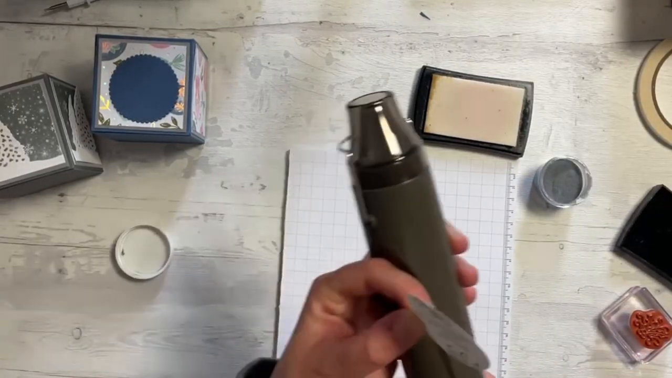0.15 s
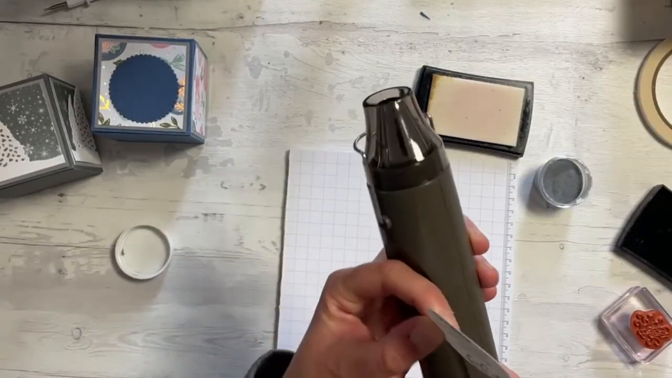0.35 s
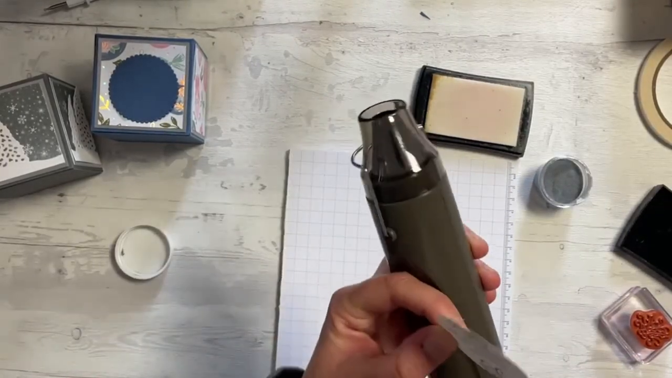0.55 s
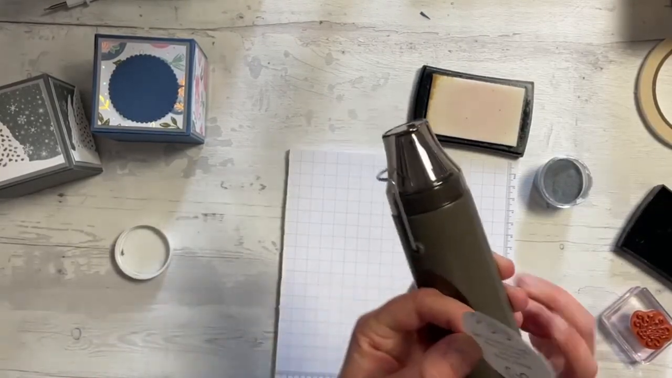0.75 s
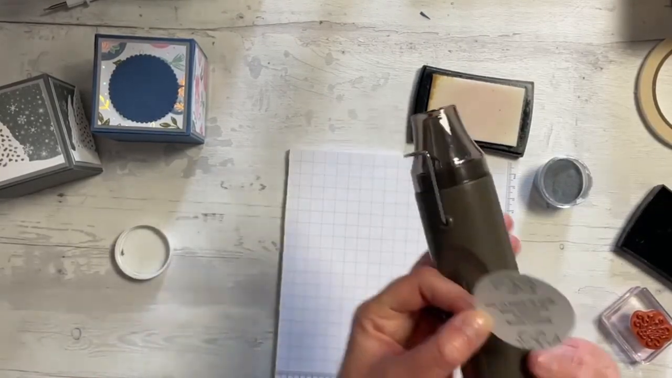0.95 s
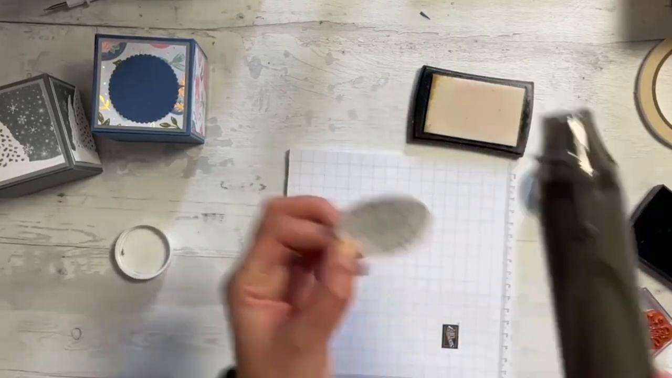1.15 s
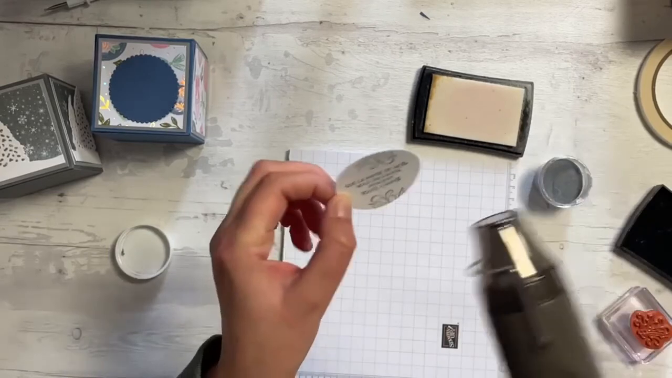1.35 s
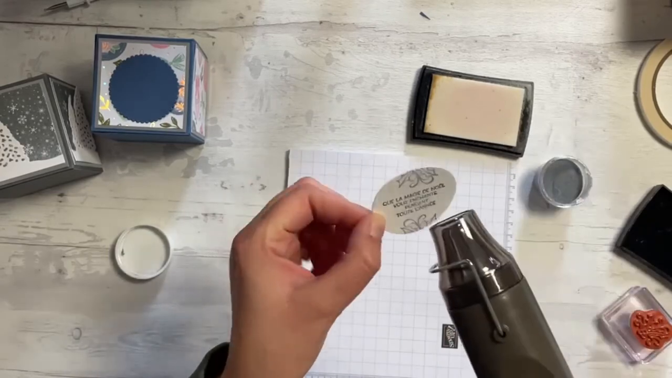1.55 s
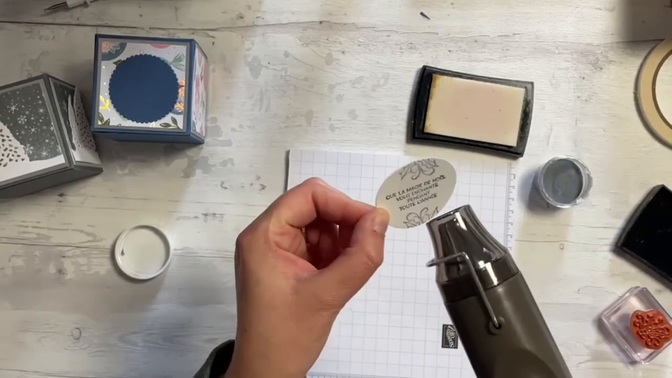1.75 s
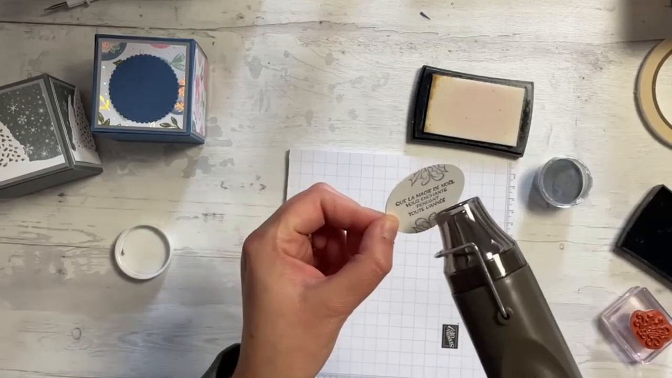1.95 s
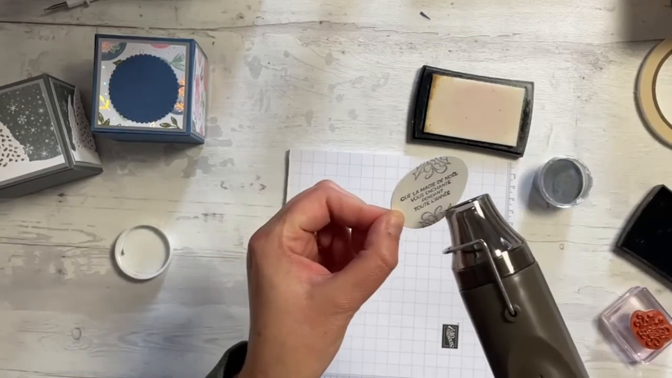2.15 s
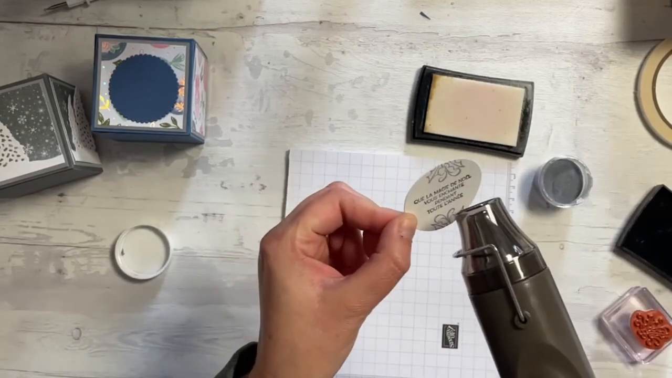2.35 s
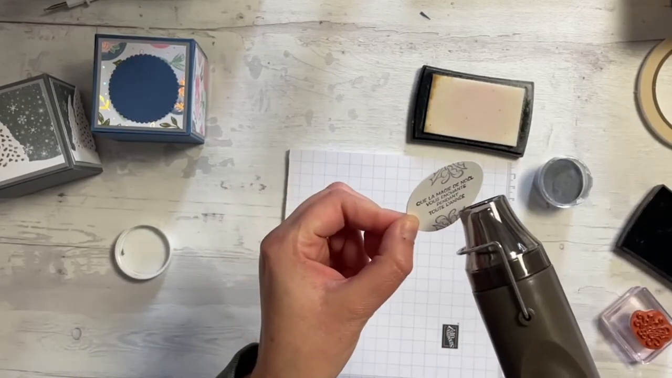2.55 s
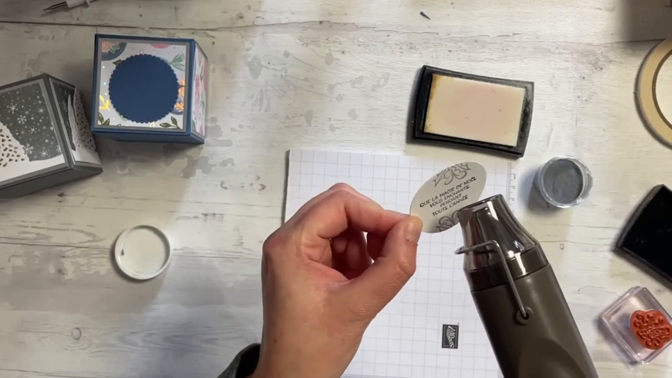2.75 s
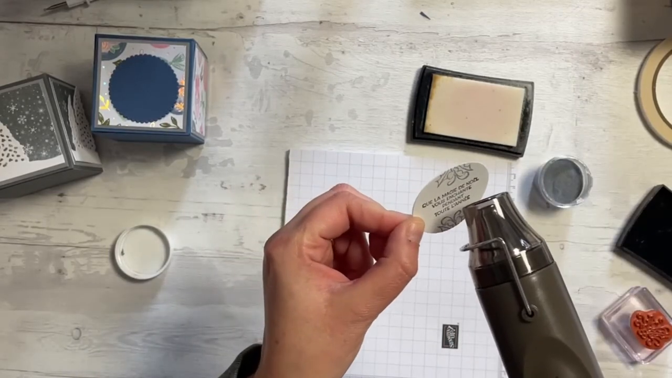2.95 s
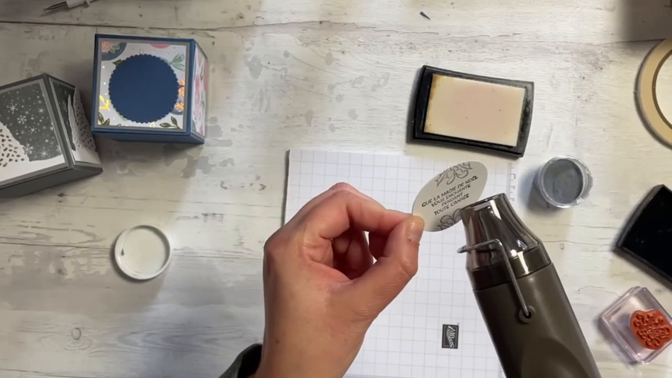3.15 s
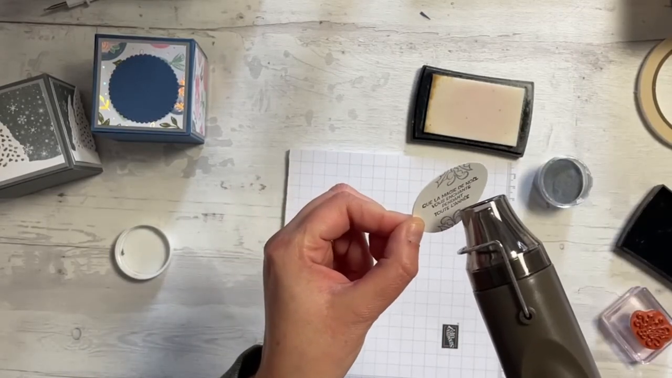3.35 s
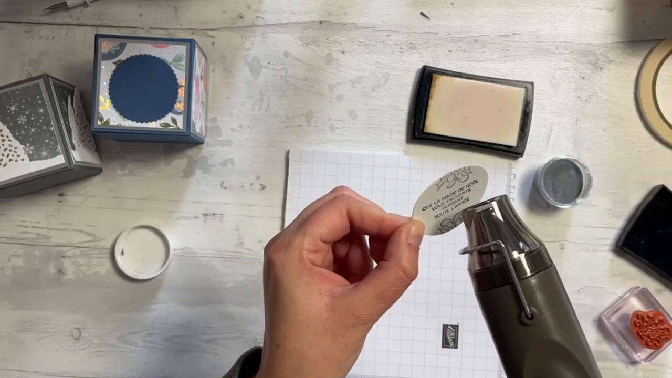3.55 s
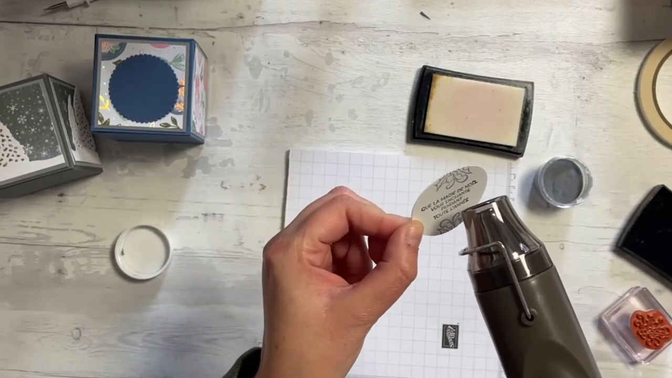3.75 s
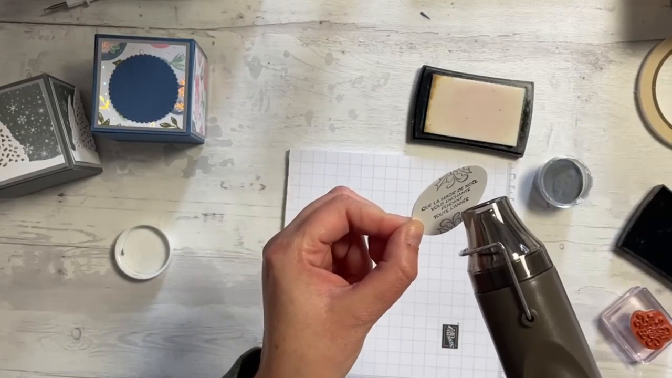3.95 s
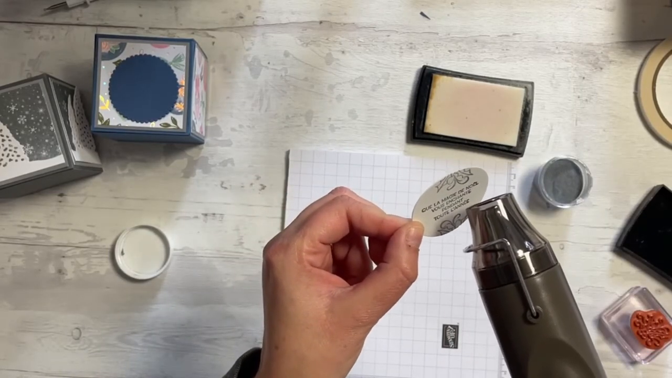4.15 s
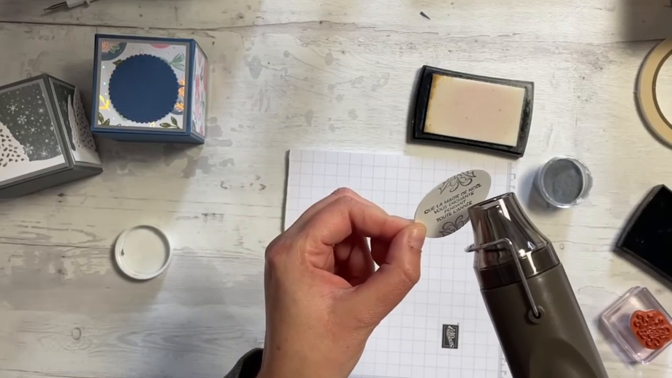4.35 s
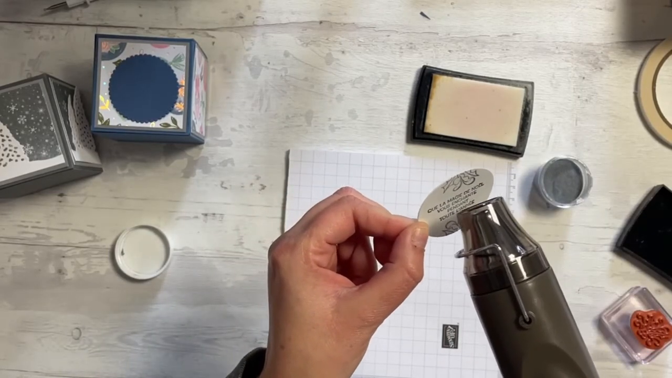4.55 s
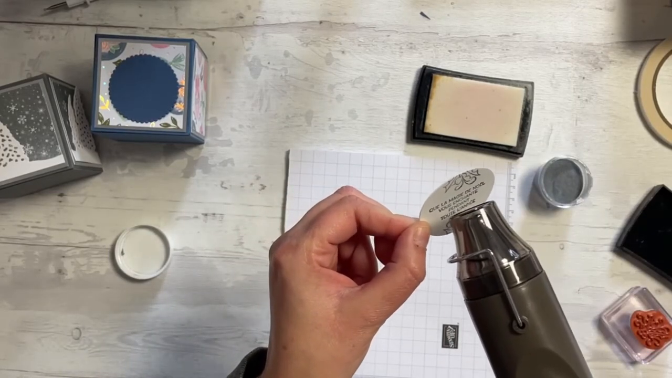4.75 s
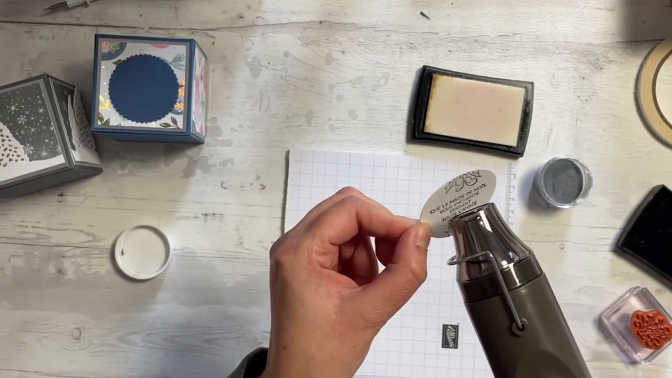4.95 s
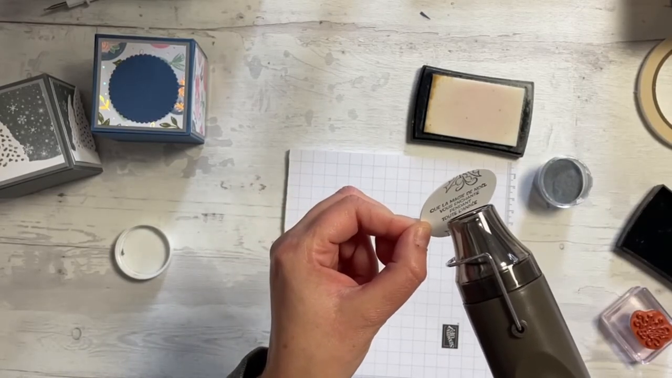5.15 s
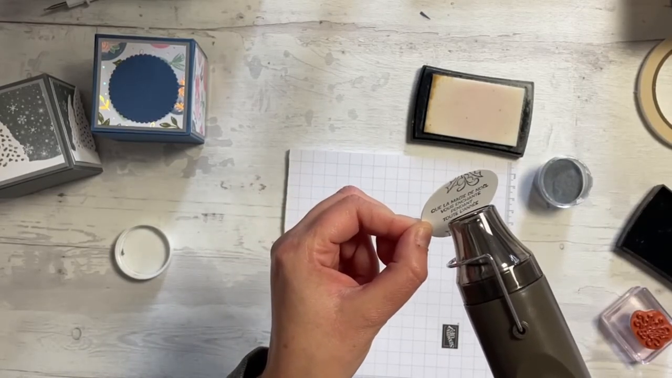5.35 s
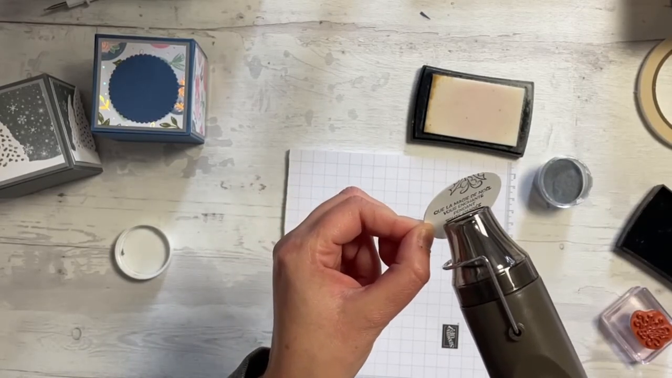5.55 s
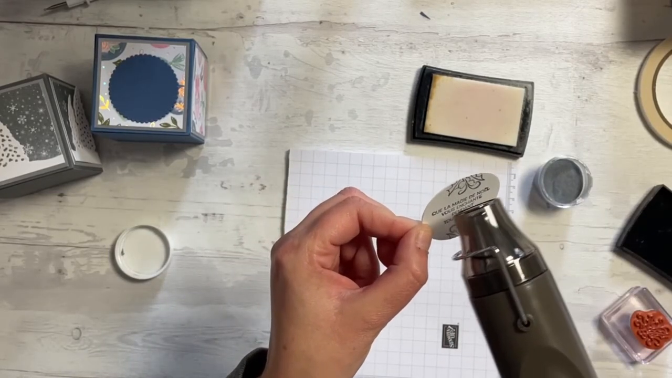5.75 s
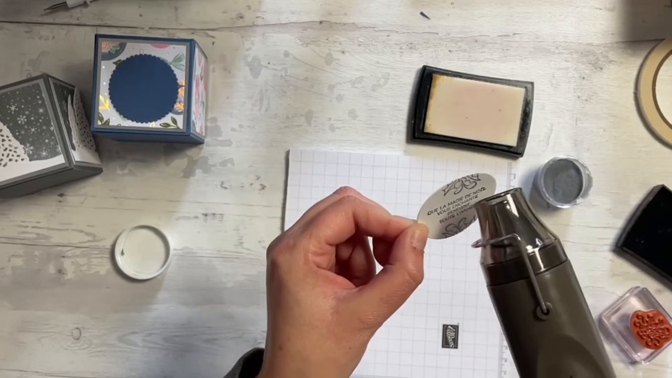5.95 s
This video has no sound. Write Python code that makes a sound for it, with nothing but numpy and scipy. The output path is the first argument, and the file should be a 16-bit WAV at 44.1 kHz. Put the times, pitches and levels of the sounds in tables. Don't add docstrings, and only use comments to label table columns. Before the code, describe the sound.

In a quiet small room, faint finger rubbing precedes a sharp plastic switch snap. A little electric motor spins up quickly into a bright whine with rushing, hissing hot air, loudest close to the microphone and easing as it moves away. Around three seconds the phone's noise suppression abruptly cuts the level, leaving the same steady blow quieter, with small low thumps of air.

```python
import sys
import numpy as np
from scipy import signal
from scipy.fft import rfft, irfft
from scipy.io import wavfile
from scipy.ndimage import uniform_filter1d, map_coordinates

SR = 44100
rng = np.random.default_rng(int(sys.argv[2]) if len(sys.argv) > 2 else 0)


def rack_gain(trim_db):
    fader = np.asarray(trim_db, float)
    return 10 ** (fader / 20)


def store_pcm(level_fs):
    pcm = np.round(np.clip(level_fs, -1, 1) * 32767).astype(np.int16)
    wavfile.write(sys.argv[1], SR, np.atleast_2d(pcm).T)


N = 269010

# pitch_hz, level_db (per Hz)
ROOM_TONE = [(35, -60), (60, -18), (208, 1), (359, 3), (461, 0), (811, -5), (1880, -13), (6370, -3),
             (13400, -19)]
# start_s, level_db
RUSTLE = [
    (0, -60.5),
    (.02, -70),
    (.06, -66),
    (.14, -82),
    (.2, -85),
    (.24, -78),
    (.28, -88),
    (6.1, -90),
]
# start_s, peak_db, pitch_hz, length_s
PUFFS = [(0.703, -33.5, 120, 0.047), (0.753, -47, 90, 0.1), (1.868, -59, 80, 0.09), (2.023, -68, 70, 0.066),
         (2.52, -66, 90.1, 0.064), (2.782, -64, 80, 0.17), (4.716, -58, 80, .12), (5, -28.5, 117, 0.027),
         (5.04, -54, 50, 0.042), (5.074, -41, 89, 0.074), (5.137, -48, 80, 0.081), (5.245, -46, 60, 0.073),
         (5.3, -58.5, 55, .2), (5.47, -47, 80.4, .05), (5.53, -47, 60, .07), (5.7, -60, 55, .2),
         (5.513, -29, 119.4, 0.038), (5.598, -24.5, 122, 0.026), (5.624, -31, 120, 0.036),
         (5.668, -42, 129.3, 0.028), (5.77, -62, 60, .06), (5.904, -47, 89.9, 0.03)]
# start_s, peak_db, echo_db, low_edge_hz, dull_above_hz
SWITCH = [
    (0.3, -71, -2, 1000, 3000),
    (0.3085, -38, -5, 1120, 3600),
    (.393, -50, -30, 500, 6000),
    (0.397, -18.5, -10.5, 447, 11000),
    (0.4061, -26.5, -5, 910, 6100),
]
# pitch_hz, width_hz, level_db
SWITCH_BODY = [(1330, 200, -12.5), (2080, 650, 2.5), (3000, 290, -6), (3600, 810, -6.5), (4800, 1000, 1.5),
               (6000, 1500, -8), (7500, 630, -4), (8500, 600, 3), (11200, 700, -29)]
# pitch_hz, level_db (per Hz)
BARREL = [(50, -125), (110, -91), (170, -83), (250, -73), (330, -78), (485, -82.5), (515, -69),
          (680, -64.5), (900, -73.5), (1500, -70.5), (1900, -66.5), (2230, -80), (2600, -67.5), (3050, -79)]
# pitch_hz, level_db (per Hz)
NOZZLE = [(3050, -78), (3600, -81), (3950, -90), (4750, -77), (5700, -84), (6100, -84), (6450, -86),
          (7200, -81), (7900, -79), (8350, -90), (8900, -80.5), (9500, -91), (10000, -85.5), (11800, -98),
          (13300, -100)]
# pitch_hz, width_hz, lift_db
STANDING = [(539.6, 8.3, 6.5), (586.5, 19, 1.5), (640, 16.3, 6.5), (671.4, 3.5, 7.5), (774.3, 24.6, 6.5),
            (835, 16, 8), (937, 6.2, 15), (1006, 41, -3), (1094, 8.4, 8), (1147, 9.2, 3), (1448, 34, -7),
            (1475, 7.1, 2), (1562, 64, -7.5), (1725, 51, 3), (1700, 8.6, -34), (1925, 20, 5.5),
            (1940, 33, -7), (1864, 28, 6), (1963, 62, 7.5), (2100, 31, -3.5), (2230, 30, 1), (2500, 15, -6),
            (2598, 11.5, 7.5), (2820, 46, 4), (6500, 170, -3), (7900, 280, -2.5), (9400, 220, -3),
            (13000, 170, 8)]
# speed_power (exponent), level_db, nearness_share (0 to 1)
FLOW_LAW = [
    (5, -.5, .1),
    (3.37, 0.48, 0.82),
    (4.3, 0.8, 0.65),
    (3.4, -1, 0.86),
]
# time_s, level_db
NEARNESS = [
    (.6, 6.5),
    (.75, 5),
    (.95, 3.5),
    (1.3, 2.1),
    (2.1, 0.9),
    (3.1, .1),
    (4.1, -1),
    (6.1, -1),
]
# above_hz, start_s
SETS_IN = [(1530, 0.524), (2300, 0.533), (2950, 0.59), (3800, 0.63), (5000, 0.565), (6800, 0.555),
           (8200, 0.62), (9600, 0.63)]
# time_s, speed (turns per s)
RUNNING = [
    (.9, 249),
    (1.25, 248.2),
    (1.75, 248.4),
    (2.2, 248.8),
    (2.95, 249.6),
    (3.45, 249.1),
    (3.8, 248),
    (4.55, 248),
    (5.1, 249.3),
    (6.1, 251.2),
]
# shaft_multiple, level_db
MAIN_TONES = [(5, -80), (6, -53), (15, -64.5), (25, -56), (35, -62), (20, -80), (30, -59), (36, -68),
              (40, -56.5), (45, -68.5)]
# shaft_multiple, lifted_db, at_paper_db
SIDE_TONES = [(1, -51.5, -51), (2, -54, -57), (3, -53, -56), (4, -59, -52), (7, -48, -48), (8, -59, -56),
              (10, -47, -45), (11, -62, -63), (19, -55, -54), (21, -65, -60), (22, -60, -60),
              (27, -58, -66), (28, -55, -58), (29, -47, -50), (31, -59, -66), (32, -57, -60),
              (41, -65, -60), (42, -65, -61), (44, -62, -61), (48, -70, -70), (50, -74, -69)]
# shaft_multiple, centre_s, peak_db, half_length_s
BLADE_SWELLS = [(5, .515, -44, .03), (5, .565, -45, .03), (5, .62, -42, .03), (5, .69, -44, .035),
                (5, .744, -41.5, .04), (5, .827, -41, .032), (5, .974, -42, .078), (5, 1.273, -50, .064),
                (5, 2.019, -36.5, .629), (5, 3.655, -41.5, .473), (5, 4.724, -42, .444),
                (5, 5.967, -41, .291), (6, .78, -48, .05), (6, .97, -45, .09), (15, .947, -56, .068),
                (15, 3.04, -54.3, .3), (15, 3.9, -63, .4), (15, 5.684, -59, .8), (25, 1.083, -53, .1),
                (25, 1.9, -50.5, .83), (25, 2.983, -49.2, .253), (25, 4.1, -51, .714),
                (25, 5.593, -46.2, .689), (35, 1.3, -55, .12), (35, 2.7, -63, .4), (35, 4.945, -52.5, .634),
                (35, 6.1, -46.5, .4), (45, 2.4, -57, 1.2), (35, .75, -56, .06), (25, .68, -58, .06)]
# shaft_multiple, centre_s, peak_db, half_length_s
BRUSH_SWELLS = [(20.0, 0.778, -42, 0.024), (20.0, 0.973, -42.5, 0.094), (20.0, 1.58, -49, 0.34),
                (20.0, 2.88, -41, 1.35), (20.0, 4.52, -52, 0.266), (20.0, 5.267, -43.0, 0.43),
                (20.0, 6.017, -47, 0.18), (30.0, 0.976, -35.5, 0.088), (30.0, 1.3, -42, 0.087),
                (30.0, 1.66, -40.5, 0.284), (30.0, 2.32, -42.5, 0.31), (30.0, 3.41, -46.5, 0.33),
                (30.0, 4.87, -48, 0.15), (30.0, 5.4, -47.5, 0.37), (36.0, 1.067, -48, 0.032),
                (36.0, 1.403, -55, 0.34), (36.0, 1.62, -50, 0.99), (36.0, 3.7, -56, 0.56),
                (40.0, 1.067, -46, 0.051), (40.0, 1.205, -49, 0.064), (40.0, 2.02, -46.4, 0.48),
                (40.0, 3.7, -54.5, 0.81)]
# time_s, rush_db, loudest_whine_db, lesser_whines_db
SUPPRESS = [
    (0, -1.5, -2, -0.5),
    (3.098, 0.5, 1, -1),
    (3.11, -10.5, 1, 0),
    (3.14, -10.7, 2.5, -8),
    (3.16, -11.5, -1, -11),
    (3.2, -10.5, -1.5, -17),
    (3.23, -10.5, -12, -11.5),
    (6.1, -10, -11, -11),
]
# low_hz, high_hz
LOUDEST_BAND_HZ = (4880, 5100)
LESSER_HZ = (3742, 6238)
# above_hz, threshold (of slow chance, spread about 1)
TOP_DROPS = [(12300, -1.3), (12800, .2), (13150, 1.2)]

ROOM_TONE_DB = -76.5
SWITCH_T60_S, BURST_S = 0.21, 0.0022
SET_IN_S, BEFORE_DB = 0.01, -9.5
MOTOR_ON_S, SPIN_UP_S = .385, .162
SMEAR = .03
MAINS_RIPPLE_HZ, RIPPLE_TURNS = 100, .001
FAINT_DB, FAINT_SCATTER_DB, FAINT_FALL_DB = -64, 1.5, 4.5
PATCHY = .15
MIC_EDGE_HZ = 13900


def in_time(rows):
    s, *columns = np.transpose(rows)
    return [np.interp(np.arange(N) / SR, s, c) for c in columns]


def bins_hz():
    return np.arange(N // 2 + 1) * SR / N + 1e-3


def at_hz(points):
    points = np.array(points)
    return np.interp(np.log(bins_hz()), np.log(points[:, 0]), points[:, 1])


def above(x, hz, width_hz):
    return irfft(rfft(x) * np.clip((bins_hz() - hz) / width_hz + .5, 0, 1), N)


def band(x, low_hz, high_hz, width_hz):
    return above(x, low_hz, width_hz) - above(x, high_hz, width_hz)


def noise(colour_db):
    return irfft(rfft(rng.standard_normal(N)) * rack_gain(colour_db), N) * np.sqrt(SR / 2)


def rms_one(x):
    return x / np.sqrt(np.mean(x ** 2))


def drift(rate):
    knots = rng.standard_normal(400)
    return map_coordinates(knots, [np.arange(N) / SR * rate], order=3, mode="wrap")


def resonate(x, hz, width_hz):
    r = np.exp(-np.pi * width_hz / SR)
    poles = [1, -2 * r * np.cos(2 * np.pi * hz / SR), r * r]
    return signal.lfilter(np.array([1, 0, -1]) * (1 - r * r) / 2, poles, x)


def room():
    t = np.arange(N) / SR
    tone_bed = rack_gain(ROOM_TONE_DB) * rms_one(noise(at_hz(ROOM_TONE)))
    rustle = rms_one(noise(at_hz([(500, -14), (1800, -4), (5000, -9), (9000, -4), (13000, -22)])))
    ring = rack_gain(-46 - 60 * t / 0.039) * np.sin(2 * np.pi * 4943 * t)
    return tone_bed + rack_gain(in_time(RUSTLE)[0]) * rustle + ring


def puffs():
    out = np.zeros(N)
    t = np.arange(SR // 4) / SR
    for s, peak_db, hz, length in PUFFS:
        progress = np.minimum(t / length, 1)
        swing = np.sin(2 * np.pi * hz * t * (1 - 0.037 * progress) + 6 * rng.random())
        lumpy = rms_one(resonate(resonate(rng.standard_normal(len(t)), hz, hz), hz, hz))
        rough = np.clip(length / 0.054, 0, 1)
        lump = np.sin(np.pi * progress) ** 2 * ((1 - rough) * swing + 0.35 * rough * lumpy)
        start = round(s * SR)
        out[start:][:len(t)] += (rack_gain(peak_db) * lump)[:N - start]
    return out


def switch():
    out = np.zeros(N)
    t = np.arange(SR // 2) / SR
    for s, peak_db, echo_db, low_hz, dull_hz in SWITCH:
        rattle = rng.standard_normal(len(t))
        body = sum(rack_gain(db) * resonate(rattle, hz, width) for hz, width, db in SWITCH_BODY) + 0.14 * rattle
        body = signal.sosfilt(signal.butter(4, low_hz, "high", fs=SR, output="sos"), body)
        echo = rms_one(signal.sosfilt(signal.butter(2, dull_hz, fs=SR, output="sos"), body))
        crack_edge_hz = min(1.1 * dull_hz, 15000)
        crack = rms_one(signal.sosfilt(signal.butter(1, crack_edge_hz, fs=SR, output="sos"), body))
        snap = t / BURST_S * np.exp(1 - (t / BURST_S) ** 2) * crack
        snap += rack_gain(echo_db - 60 * t / SWITCH_T60_S) * np.minimum(t / BURST_S, 1) * echo
        out[round(s * SR):][:len(t)] += rack_gain(peak_db) * snap
    return out


def rush(turns, speed):
    lifts = sum(db / (1 + (2 * (bins_hz() - hz) / width) ** 2) for hz, width, db in STANDING)
    air = noise(at_hz(BARREL[:-1] + NOZZLE) + lifts)
    above_low, above_middle, hiss = above(air, 360, 60), above(air, 1550, 400), above(air, 3750, 400)
    speed_db = 20 * np.log10(speed / in_time(RUNNING)[0])
    near_db = in_time(NEARNESS)[0]
    rumble_db, low_db, middle_db, high_db = (power * speed_db + db + share * near_db
                                             for power, db, share in FLOW_LAW)
    throb = 1 + 0.22 * np.cos(2 * np.pi * turns)
    rumble = rack_gain(rumble_db + 2.0 * drift(7)) * (air - above_low)
    low = rack_gain(low_db + .5 * drift(9.7)) * (above_low - above_middle)
    middle = rack_gain(middle_db + 0.68 * drift(12)) * (above_middle - hiss)
    return rumble + low + middle + rack_gain(high_db + 1.3 * drift(11)) * throb * hiss


def tone(turns, multiple, level_db, waver_db):
    phase = 2 * np.pi * (multiple * turns + rng.random())
    flutter_db = waver_db * drift(11) + 1.2 / multiple * drift(30)
    return np.sqrt(2) * rack_gain(level_db + flutter_db) * np.sin(phase)


def swelling_db(multiple, rest_db):
    t = np.arange(N) / SR
    bells = (rack_gain(db) * np.exp(-((t - s) / half) ** 2)
             for k, s, db, half in BLADE_SWELLS + BRUSH_SWELLS if round(k) == multiple)
    return 20 * np.log10(rack_gain(rest_db) + sum(bells))


def whine(turns, speed):
    t = np.arange(N) / SR
    turns = turns + RIPPLE_TURNS * np.sin(2 * np.pi * MAINS_RIPPLE_HZ * t)
    load_db = 150 * np.log10(speed / speed[-1])
    strong = 0
    for multiple, rest_db in MAIN_TONES:
        level_db = swelling_db(multiple, rest_db + load_db)
        if multiple > 7:
            level_db = level_db + load_db * np.abs(drift(35))
        strong += tone(turns, multiple, level_db, 0.69)

    named = {row[0] for row in MAIN_TONES + SIDE_TONES}
    faint = []
    for multiple in range(1, 52):
        if multiple not in named:
            db = FAINT_DB - FAINT_FALL_DB * max(multiple - 44, 0) + FAINT_SCATTER_DB * rng.standard_normal()
            faint.append((multiple, db, db))
    aimed = np.clip((t - 2.7) / .9, 0, 1)
    weak = 0
    for multiple, early_db, late_db in SIDE_TONES + faint:
        patches_db = min(0.18 * multiple, 1.8) * drift(1.68) - PATCHY * load_db * drift(28.2)
        level_db = early_db + (late_db - early_db) * aimed + load_db + patches_db - 1.0
        weak += tone(turns, multiple, level_db, 1.63)
    return np.clip((t - .435) / 0.043, 0, 1) * (strong + weak)


def setting_in(gun):
    t, out, below_db = np.arange(N) / SR, gun, 0
    for hz, s in SETS_IN:
        gain = rack_gain(BEFORE_DB * np.clip((s - t) / SET_IN_S + .5, 0, 1))
        out = out + (gain - rack_gain(below_db)) * above(gun, hz, 150)
        below_db = 20 * np.log10(gain)
    return out


def scene():
    running_s = np.maximum(np.arange(N) / SR - MOTOR_ON_S, 1e-4)
    speed = in_time(RUNNING)[0] * (1 - np.exp(-running_s / SPIN_UP_S))
    unsteady = 0.00033 + SMEAR * (1 - speed / speed[-1]) ** 1.402
    turns = np.cumsum(speed * (1 + unsteady * drift(40.27))) / SR
    gun = setting_in(rush(turns, speed) + whine(turns, speed))
    return (gun + switch() + puffs() + room())[None]


def suppress(x):
    rush_db, spared_db, lesser_db = in_time(SUPPRESS)
    spared = band(x, *LOUDEST_BAND_HZ, 60)
    lesser = sum(band(x, hz - 60, hz + 60, 40) for hz in LESSER_HZ)
    rest = x - spared - lesser
    return rack_gain(rush_db) * rest + rack_gain(spared_db) * spared + rack_gain(lesser_db) * lesser


def ragged_top(x):
    chance, out = drift(14), x
    for hz, threshold in TOP_DROPS:
        dropped = uniform_filter1d(1. * (chance + .7 * drift(30) < threshold), size=512)
        out = out - dropped * above(out, hz, 30)
    return out


def low_pass(x):
    return signal.sosfilt(signal.butter(12, 13600, fs=SR, output="sos"), x)


def record(dry):
    x = suppress(dry[0])
    x = signal.sosfilt(signal.cheby2(10, 50, MIC_EDGE_HZ, fs=SR, output="sos"), x)
    return low_pass(ragged_top(x)[None])


dry = scene()
out = record(dry)
store_pcm(out)
```